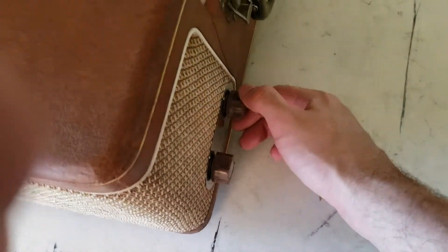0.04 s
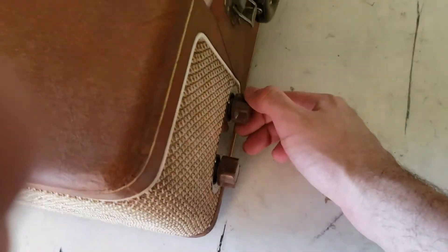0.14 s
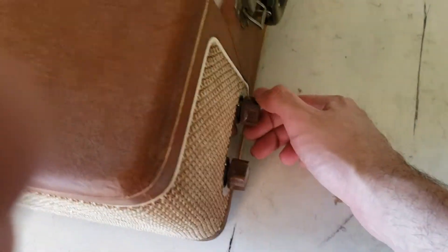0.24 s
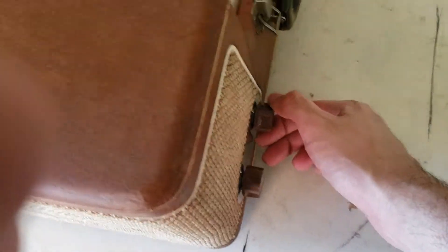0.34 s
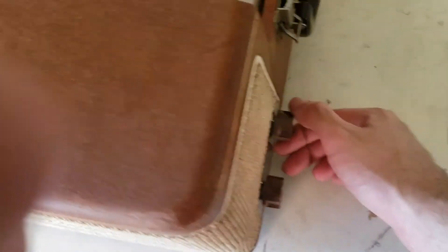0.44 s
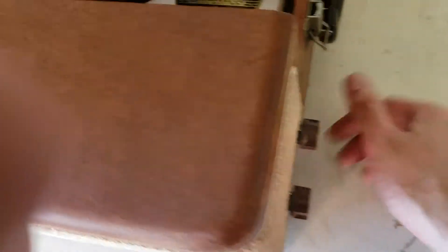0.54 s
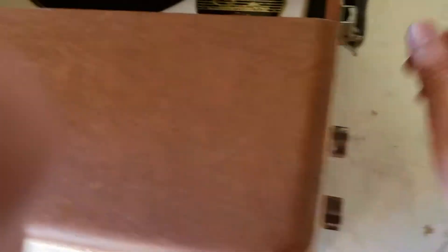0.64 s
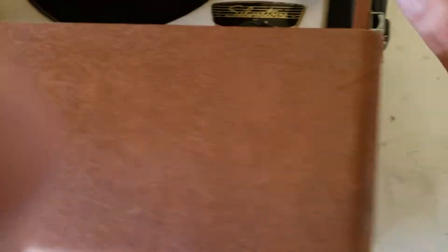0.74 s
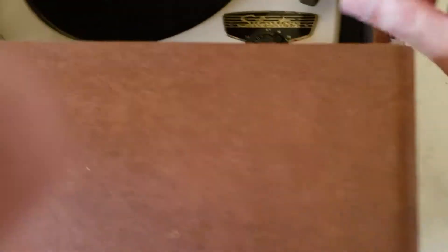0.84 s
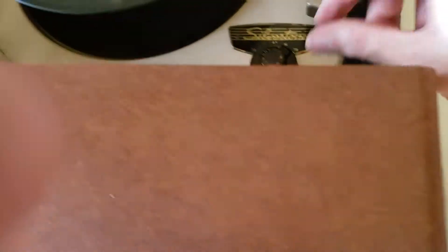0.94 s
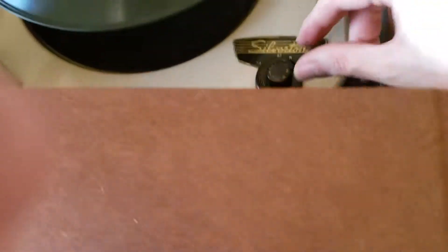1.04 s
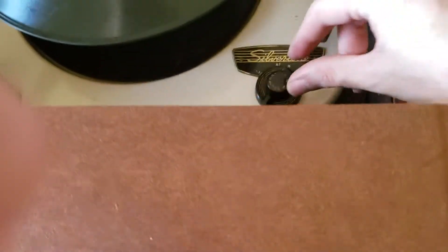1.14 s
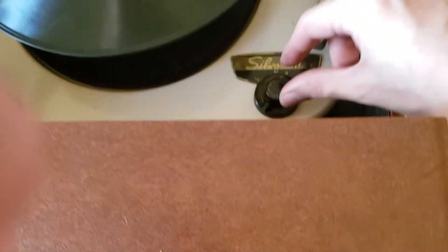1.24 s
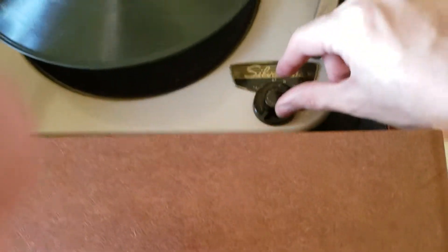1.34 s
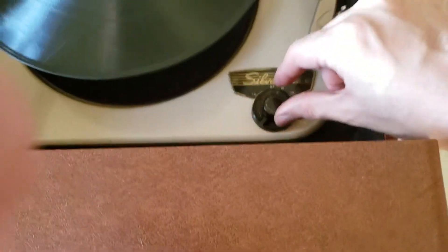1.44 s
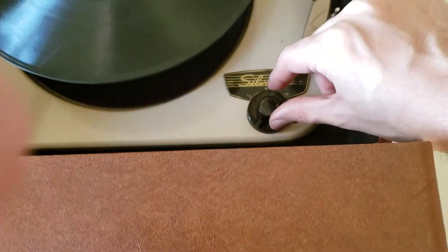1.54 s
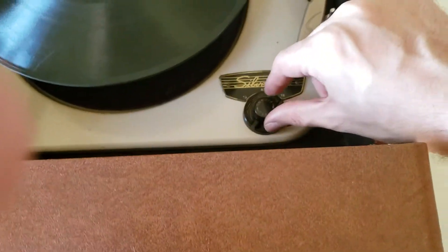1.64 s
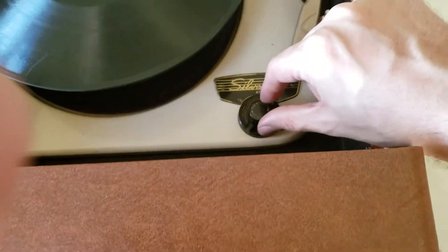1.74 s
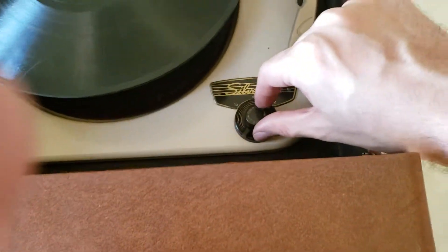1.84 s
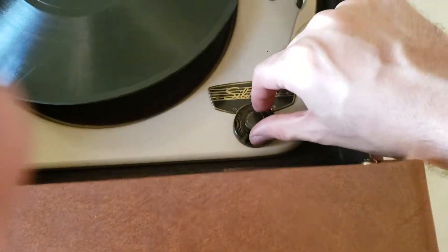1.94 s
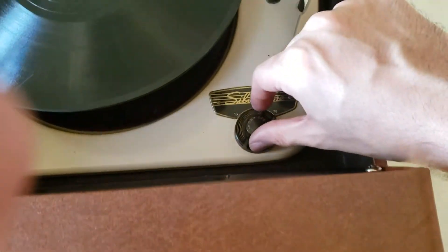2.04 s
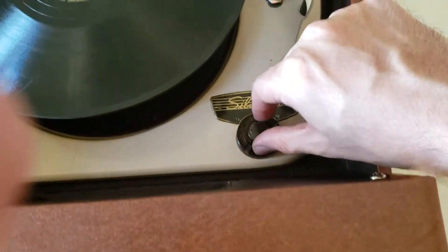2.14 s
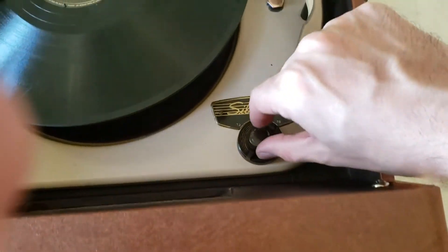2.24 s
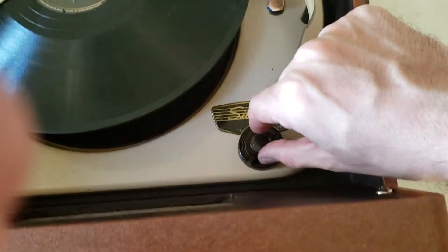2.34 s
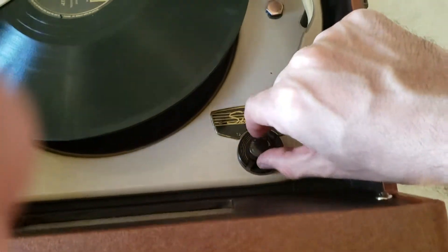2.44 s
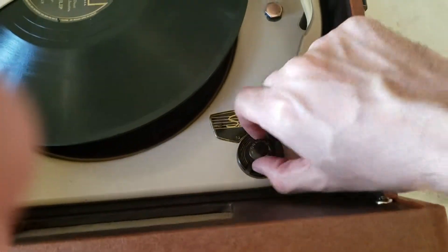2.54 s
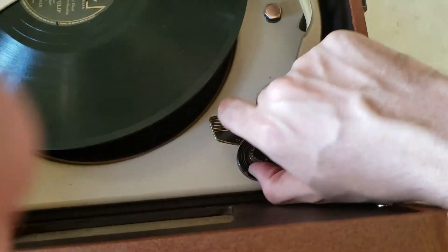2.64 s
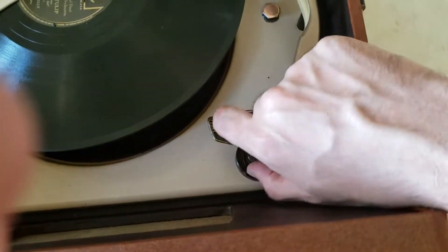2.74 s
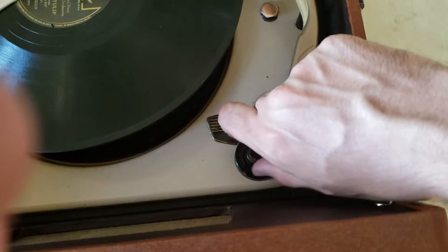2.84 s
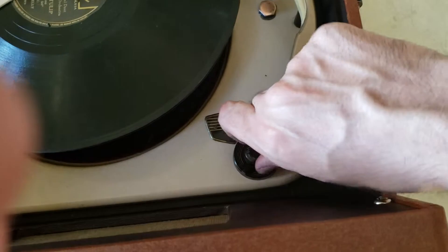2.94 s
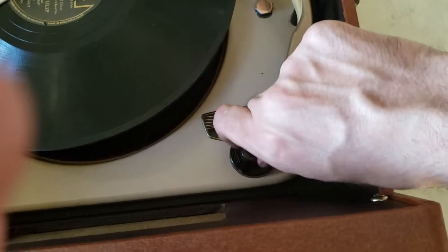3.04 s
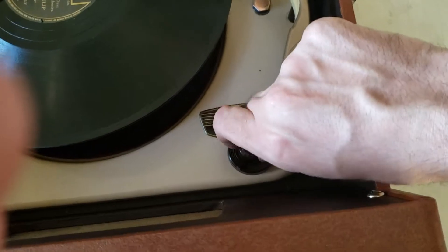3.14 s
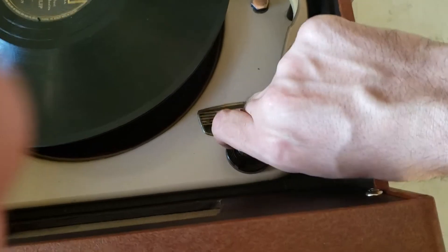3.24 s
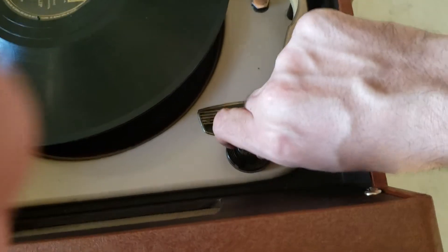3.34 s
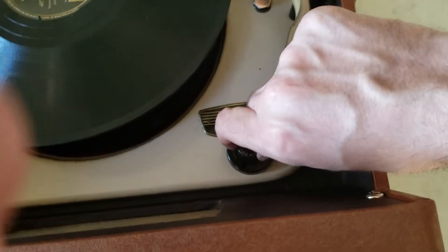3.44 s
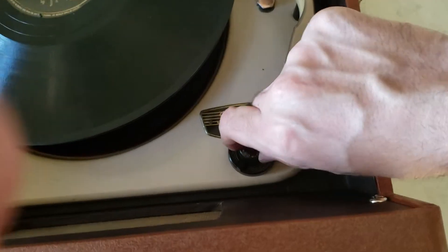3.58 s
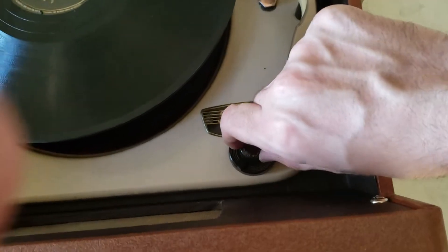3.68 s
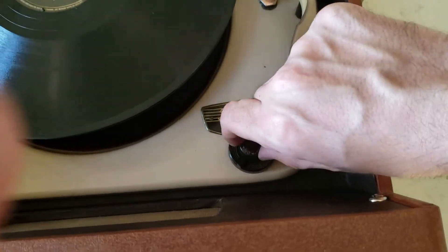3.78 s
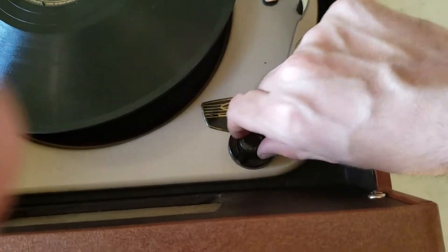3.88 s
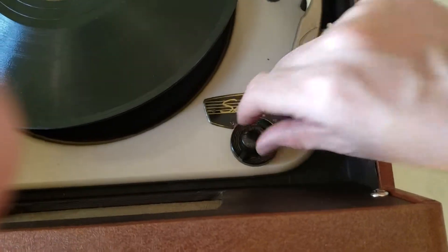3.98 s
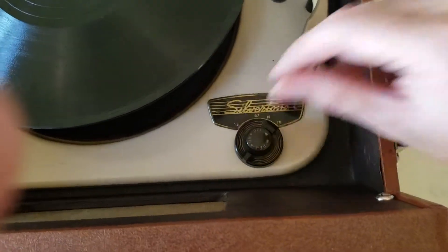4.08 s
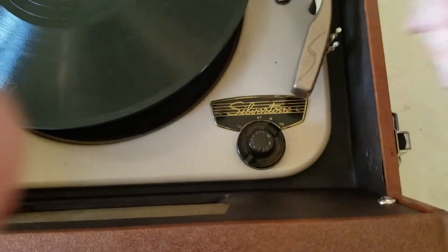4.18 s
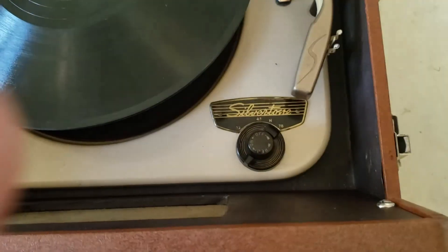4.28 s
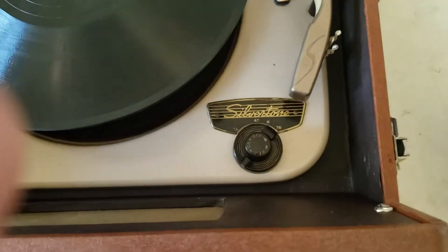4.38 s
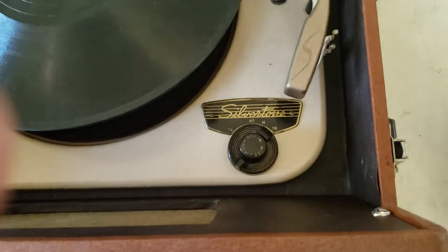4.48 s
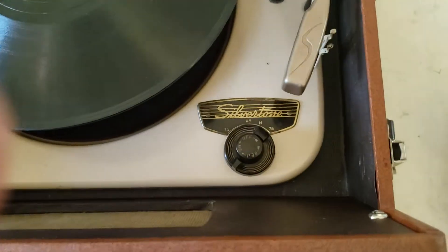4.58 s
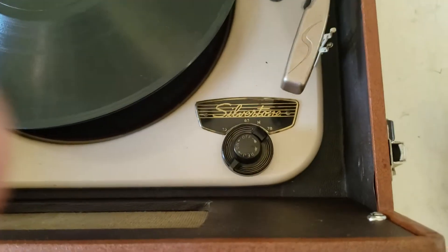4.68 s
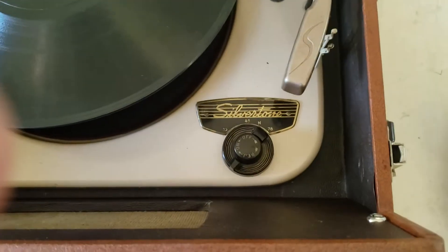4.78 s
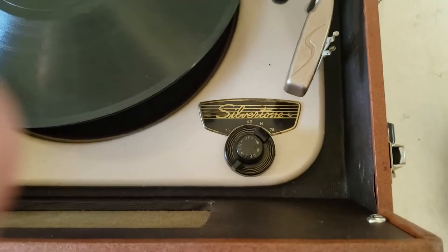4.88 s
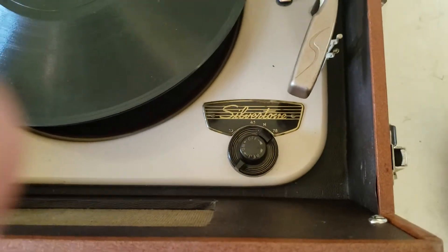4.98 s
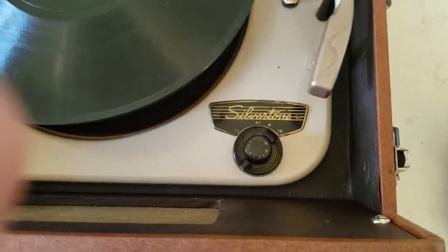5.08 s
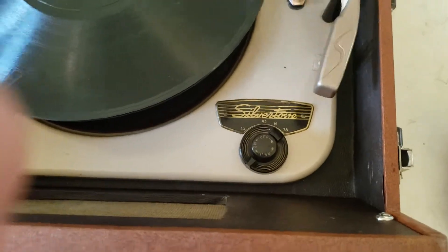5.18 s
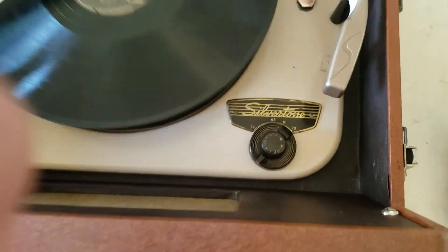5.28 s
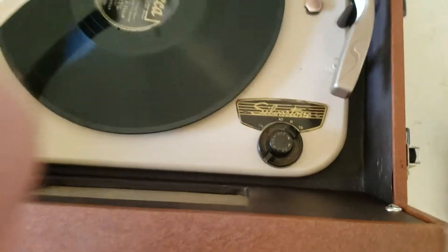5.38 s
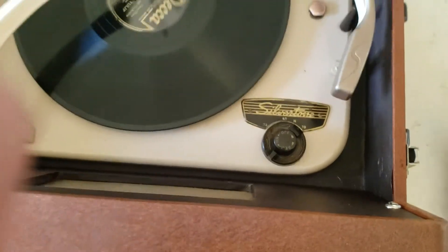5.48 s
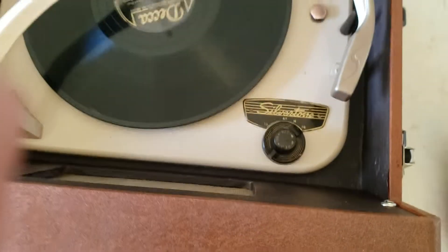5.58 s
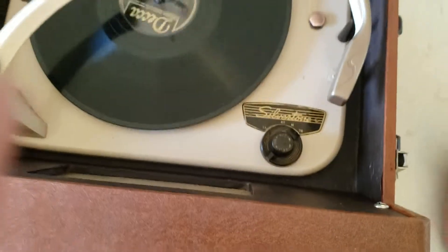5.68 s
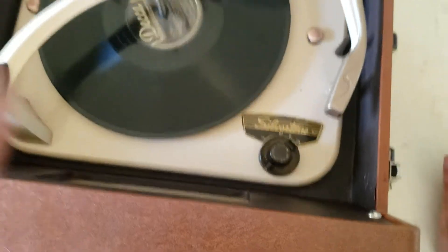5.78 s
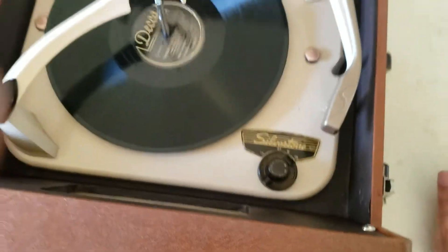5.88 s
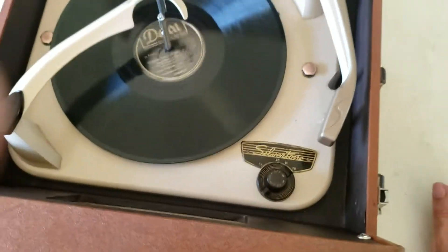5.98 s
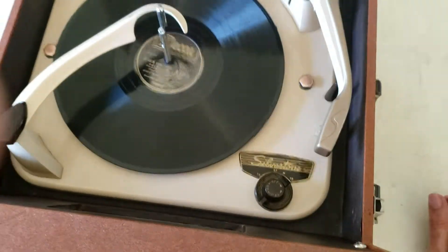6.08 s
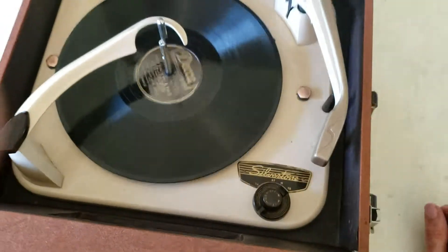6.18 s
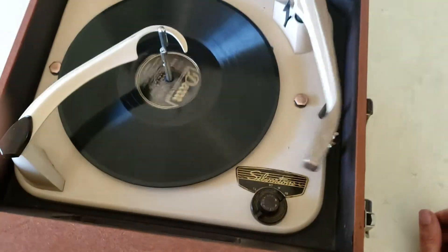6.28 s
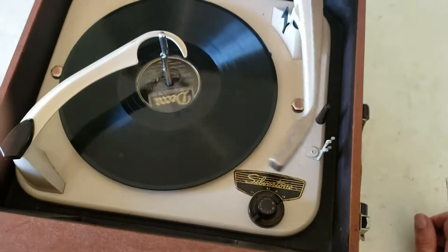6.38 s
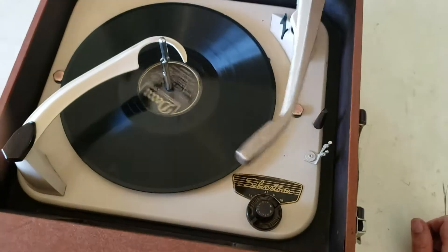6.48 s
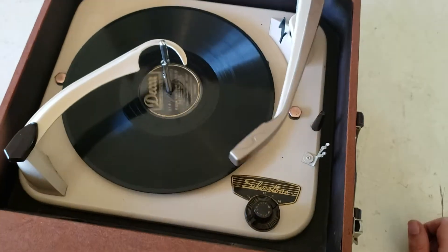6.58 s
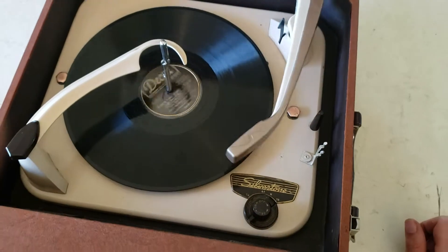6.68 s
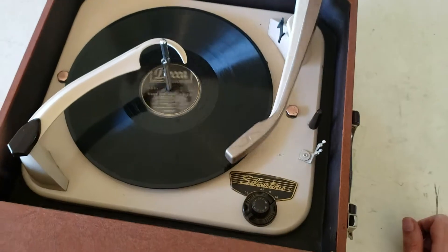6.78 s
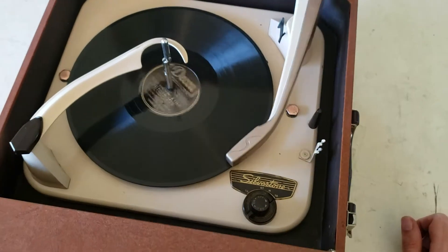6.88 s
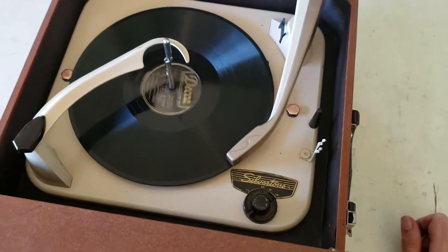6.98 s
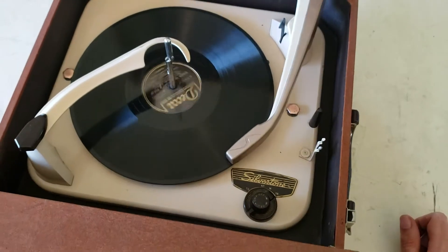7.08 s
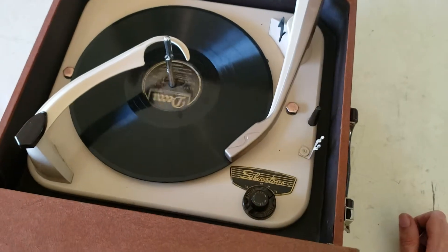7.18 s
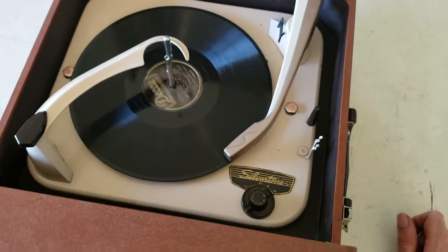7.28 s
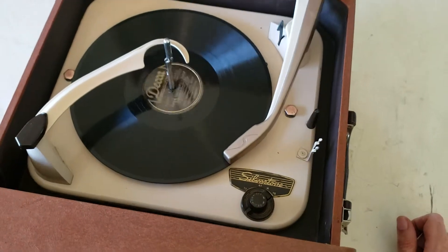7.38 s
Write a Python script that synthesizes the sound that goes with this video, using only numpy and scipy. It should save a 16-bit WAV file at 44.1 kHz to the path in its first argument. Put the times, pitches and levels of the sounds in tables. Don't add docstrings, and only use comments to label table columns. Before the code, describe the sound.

Close mechanical clicks and clunks of an old record changer over faint motor hum, with a heavy disc-drop clack, ticking pawl and soft needle hiss.

```python
import sys
import numpy as np
from scipy import signal
from scipy.fft import rfft, irfft, next_fast_len
from scipy.io import wavfile

SR = 44100
rng = np.random.default_rng(int(sys.argv[2]) if len(sys.argv) > 2 else 0)


def elevation(decibels):
    levels = np.asarray(decibels, float)
    return 10 ** (levels / 20)


def materialize(psi):
    bounded = np.clip(np.atleast_2d(psi).T, -1, 1)
    quanta = np.round(bounded * 32767).astype(np.int16)
    wavfile.write(sys.argv[1], SR, quanta)


N = 327307

# t/s, cam load/dB, sliding speed/dB
GEAR = [(0, 1, 6), (.9, -.8, -1), (2.0, 0.2, -1), (3.0, 1, 1), (3.14, 4, 9), (3.6, -.4, 1), (3.85, 3.5, 12),
        (4.0, 8, 24), (4.4, 5, 14.5), (4.876, 9.5, 23), (5.12, 10, 6), (5.27, 5, 22.5), (5.55, 6, 9),
        (5.8, 1.5, 2.5), (5.96, 0, 10), (6.26, -1.3, 5), (6.94, 0.2, 14), (7.42, -3, 9)]
IDLE_DB = [-58, -80, -82.5, -86.5]
# f/Hz, density/dB per Hz
RUMBLE = [(25, -25), (40, -16.5), (50, -0.5), (100, -11), (150, -15.5), (240, -3.5), (400, -5.5),
          (550, -11), (700, -8.5), (850, -18.5), (1000, -25.5), (1300, -34.5)]
# f/Hz, density/dB per Hz
RUB = [(1000, -0.5), (1900, -16.5), (2900, -11.5), (3600, -13.5), (4500, 5.5), (5700, -24), (7200, -5.5),
       (8300, -22), (10000, -17), (13000, -12), (16000, -12)]
# f/Hz, width/Hz, level/dB
SQUEAK = [(1427, 40, -4.5), (4200, 50, -6), (4410, 30, 1.5), (6400, 30, -5)]
# f/Hz, width/Hz, level/dB
GROOVE = [(4850, 50, 1.5), (12000, 70, 1.5), (14800, 100, 0.5)]
# t/s, hold/s, time to lose 30 dB/s, case level/dB, steel level/dB
SHUDDERS = [
    (2.283, .02, 0.1, -51, -63),
    (2.416, .165, 0.5, -45.5, -82),
    (2.597, .005, 0.3853, -32.5, -66),
    (5.3, .005, 0.88, -39.5, -62),
    (5.3, .005, 0.17, -45, -26),
]
NEEDLE_DB = [-61, -59, -63]
# f/Hz, width/Hz, level/dB
HUM = [(48, 8.9, -10), (97.3, 8, -3), (123.3, 2.6, -8.5), (179.8, 7.1, -9), (243.1, 8, -1),
       (386.5, 18.6, -5), (448.4, 8.8, -8), (582, 10, -16.5), (1360, 9.4, -24)]
# t/s, f/Hz, level/dB
WHIRR = [(0, 388, -76), (1.0, 388, -66), (2.3, 389, -63), (3.3, 388, -60), (5.2, 388, -60), (5.6, 387, -63),
         (6.8, 389, -63), (7.42, 389, -67)]
# t/s, hold/s, time to lose 30 dB/s, level/dB
STEPS = [(.45, 0.24, .9, -56.5), (1.38, .14, .25, -56), (2.8, .5, 0.5, -64), (5.2, .2, 1.5, -68)]
# f/Hz, density/dB per Hz
HISS = [(530, -31.5), (900, -15), (1360, -24.5), (1670, -11.5), (5790, -24.5), (7300, -4), (9200, -28),
        (15200, -14.5), (15900, -27), (16500, -42)]
# f/Hz, correlation/1
LIKENESS = [(30, 0.94), (300, 0.79), (700, 0.2), (1500, 0), (3000, 0), (16000, 0.0078)]
# t of top speed/s, half length/s, top whine f/Hz, whine level/dB, dry bearing level/dB
KNOB = [
    (.132, 0.099, 11800, -64.5, -66),
    (2.495, .12, 11400, -88, -110),
]
# f/Hz, width/Hz, level/dB
BEARING = [(1710, 250, -11), (2300, 500, -6.5), (4520, 220, -2), (6000, 390, -6), (11500, 1400, -9)]
# t/s, f/Hz, level/dB, t60/s
RINGS = [(.22, 4500, -72, .35), (2.225, 90, -50.5, 0.23), (2.415, 543, -45, 0.074), (2.593, 975, -36, 0.55),
         (2.594, 540, -31, 0.15), (2.61, 131.4, -35, 0.3), (2.903, 5100, -43, 0.055), (2.908, 300, -35, .1),
         (3.09, 310, -29, .09), (3.134, 330, -37, .1), (3.09, 6380, -28, 0.056), (3.09, 12600, -35, 0.19),
         (3.858, 810, -33, 0.077), (4.462, 5170, -33, 0.024), (4.644, 5220, -33, 0.12), (4.8, 270, -40, .1),
         (5.091, 13700, -27, 0.2), (5.115, 300, -37, .1), (5.29, 2300, -37, 0.07), (5.31, 56.3, -45, 0.64),
         (5.314, 7600, -24, 0.15), (5.315, 6300, -25, .08), (5.314, 1150, -26, 0.11),
         (5.313, 268, -20.5, 0.086), (5.314, 1620, -32, .09), (5.36, 272, -31, .09),
         (5.377, 769, -14, 0.028), (5.378, 1330, -24, .03), (5.385, 385, -19, .1), (5.4, 1830, -42, .3),
         (5.379, 990, -19, 0.07), (5.372, 180, -21, .08), (5.379, 640, -27, .1), (5.3, 740, -30, .1),
         (5.312, 930, -26, .06), (5.66, 850, -48, .08), (5.922, 860, -54, .15),
         (6.14, 1084, -52, 0.078), (6.227, 1600, -42, .05), (6.228, 4080, -40, 0.12),
             (6.228, 2300, -45, .05), (6.58, 1000, -40, .06), (6.365, 6000, -56, 0.11),
             (6.491, 1310, -34, 0.07), (6.491, 2300, -38, .05), (6.491, 350, -39, .08),
             (6.552, 12200, -39, .14), (6.552, 1350, -42, .07), (6.826, 3960, -33, 0.043),
             (6.826, 1420, -41, 0.06), (6.826, 380, -44, .1), (6.826, 2900, -38, .08),
             (6.826, 2150, -41, .08), (6.948, 150, -53, .25), (6.951, 274, -46, 0.1),
             (6.953, 14600, -48, .04), (7.15, 294, -45, 0.055), (7.197, 7300, -52, .05)]
# t/s, hold/s, time to lose 30 dB/s, dull level/dB, bright level/dB
FINGER = [(.4, 0.4, 1.5, -100, -82), (1.073, .02, .4, -79, -82), (1.56, .09, .2, -68, -86),
          (2.08, .27, .6, -59, -67), (2.577, .01, 0, -55, -67.5)]
# f/Hz, density/dB per Hz
SCUFF = [(1100, 2.5), (1800, 5.5), (2400, .5), (3000, -17), (5000, -7.5), (6300, -10.5), (7300, 8.5),
         (8000, -6)]
# t/s, lever snap/dB, case thump/dB, chatter t60/s
SNAPS = [(1.543, -68, -46, .07), (2.27, -49, -43.5, 0.081), (2.9109, -43, -38.5, 0.046),
         (3.0895, -18, -33, 0.041), (3.898, -38.5, -48, .1), (3.9797, -21.5, -40, .049),
         (4.0215, -30, -51, 0.03), (4.6441, -28, -46.5, 0.024), (4.6595, -27.5, -42, 0.051),
         (4.8795, -49, -37, .04), (5.0808, -29.5, -45, 0.069), (5.0837, -24, -47, .12),
         (5.0913, -18.5, -32.5, .045), (5.2346, -37, -49.5, 0.016), (5.2899, -22.5, -48, 0.042),
         (5.2988, -16.5, -34, .02), (5.3142, -12.5, -25, .045), (5.3782, -30, -14, 0.04),
         (6.552, -34, -44, .08), (5.3851, -24, -34, .04), (5.344, -24, -32, .04)]
# t/s, snap/dB, thump/dB, chatter t60/s
CLICKS = [(2.067, -64, -65, 0.054), (2.2197, -48, -54.5, .044), (2.2362, -48.5, -44.5, 0.067),
          (2.6704, -58, -38, 0.057), (2.9023, -46, -40, 0.03), (3.8591, -31, -38, 0.038),
          (4.8452, -44, -39, .083), (5.0191, -56, -49.5, .056), (5.058, -52, -47, .048),
          (6.7075, -47.5, -70, 0.032)]
# t/s, snap/dB, thump/dB, chatter t60/s
KNOCKS = [(2.4136, -64, -35, 0.097), (2.4493, -70.5, -44, 0.078), (2.4877, -67, -37, .04),
          (2.592, -50.5, -24, 0.13), (2.602, -48, -27, .1), (2.6243, -43, -28, 0.13), (2.645, -56, -33, .1),
          (2.741, -66, -40, .05), (2.806, -60, -51, 0.056), (3.134, -34, -42, .04),
          (4.4621, -34, -51, .015), (4.799, -47.5, -41.5, 0.031), (4.9327, -50, -47.5, 0.027),
          (4.9553, -51, -60, .034)]
# t/s, snap/dB
TICKS = [(5.443, -32), (5.5202, -33), (5.6134, -34), (5.6846, -37), (5.7617, -38.5), (5.8407, -45.5),
         (5.914, -53.5)]
# t/s, thump/dB
NUDGES = [(5.667, -46), (5.788, -56), (5.82, -57), (5.865, -56), (5.926, -53), (5.977, -55), (6.011, -57),
          (7.042, -54), (7.075, -56), (7.12, -56), (7.14, -55)]
# t/s, snap/dB, thump/dB, chatter t60/s, small parts re snap/dB
ARM = [(6.1409, -55, -45, .028, -11), (6.2275, -39.5, -48, .017, -28), (6.364, -48, -56, .06, -20),
       (6.4907, -28, -42, .028, -10), (6.58, -38, -41, .05, -11), (6.778, -47, -66, .051, -32),
       (6.8253, -30, -52, .055, -36), (6.9525, -51, -60, .03, .1), (6.988, -51, -61, .02, .1),
       (7.1967, -53, -60, .03, -9), (7.2582, -55, -57, .022, -22)]
SMALL_PARTS_DB = [-5, -13, -25, -12]
DECK_DB = [.1, 1.5, 2.5, -4]
# f/Hz, level/dB, t60/s
CASE = [(176.7, -14, 0.21), (279.6, -2, 0.12), (317, -6.5, 0.098), (391.5, -1, 0.11), (483.5, -5, 0.076)]
# f/Hz, level/dB, t60/s
DECK = [(699, -0.5, 0.093), (810, -10, 0.15), (965, 4.5, 0.089), (1150, 1.5, 0.035), (1407, 0.5, 0.05),
        (1640, -1.5, .07), (2300, -2.5, 0.21)]
# f/Hz, level/dB, t60/s
STEEL = [(4050, -1.5, 0.064), (4330, 8.6, 0.12), (6690, 6.1, 0.033), (7600, 2.3, 0.18)]
# f/Hz, level/dB, t60/s
SMALL = [(10300, -1.5, 0.11), (12670, -4, 0.046), (13700, 0, 0.076)]
ROOM_T60_S = [0.6, 0.32, .4, 0.3]
# f/Hz, width/Hz, level/dB
CARRIER = [(1330, 120, 0), (1790, 73, -2), (2410, 120, -4), (2830, 180, -3), (3270, 130, -8),
           (4790, 53, -5), (7310, 130, -10), (11000, 310, -13), (11900, 140, -10), (12900, 68, -13),
           (13800, 96, -12), (14900, 160, -10)]

SHUDDER_DECK_DB, SHUDDER_FINE_DB = -15.5, -14
FINE_FOLLOWS, BOOM_FOLLOWS, HUM_FOLLOWS = .25, .5, .24
MOTOR_ON_S, HUM_OFF_DB, HUM_ON_DB = 2.3, -66, -62
STEP_ATTACK_S, STILL_DB, BOOM_DB, HISS_DB = .6, -73, -60, -84
AWAY_S, AWAY_END_S, AWAY_BOOM_DB, AWAY_HUM_DB = 5.3, 7.3, -21, -6
SLOW_HZ, WHINE_SLOPE_DB, BEARING_LINGER_S = 3300, 33, .19
BRIGHT_DIES_FASTER = 1.8
PAWL_HZ, PAWL_DB, PAWL_T60_S = 4400, -6, .06
TICK_THUMP_DB, TICK_CHATTER_S, TICK_DULLING = -18, .009, .9
NUDGE_SNAP_DB, NUDGE_DECK_DB, NUDGE_CHATTER_S = -22, 1.2, .04
ARM_DECK_DB, DECK_SHARE = 5.0, .52
NEEDLE_S, NEEDLE_HOLD_S, NEEDLE_FADE_S, CARRIER_DB = 6.955, .2, 1.3, -69
LEFT_LAG = 5


def rms_one(x):
    return x / np.sqrt(np.mean(x ** 2) + 1e-20)


def in_time(rows):
    s, *columns = np.transpose(rows)
    return [np.interp(np.arange(N) / SR, s, c) for c in columns]


def at_hz(points, hz):
    points = np.array(points)
    return np.interp(np.log(hz), np.log(points[:, 0]), points[:, 1])


def band(x, low_hz, high_hz):
    return signal.sosfilt(signal.butter(2, [low_hz, high_hz], "band", fs=SR, output="sos"), x)


def drift(rate, spread_db):
    r = np.exp(-80 * np.pi * rate / SR)
    slow = signal.lfilter([1], [1, -2 * r, r * r], rng.standard_normal(N // 40 + 2002))[2000:]
    return np.interp(np.arange(N) / 40, np.arange(len(slow)), elevation(spread_db * rms_one(slow)))


def ring(x, hz, width_hz):
    r, w = np.exp(-np.pi * width_hz / SR), 2 * np.pi * hz / SR
    return signal.lfilter([0, np.sin(w)], [1, -2 * r * np.cos(w), r * r], x + 1e-18)


def swell(s, attack_s, hold_s, release_s):
    t = np.arange(N // 44 + 2) / 1000
    rise = np.minimum(30 * (t - s) / attack_s, 0)
    return np.minimum(rise, -30 * (t - s - hold_s) / release_s)


def loudest(*levels_db):
    top = np.max(np.broadcast_arrays(*levels_db), axis=0)
    return np.interp(np.arange(N) / SR, np.arange(len(top)) / 1000, top)


def banded_noise(spectrum, low_hz, high_hz, patchy_db, grain_db, count):
    edges = np.geomspace(low_hz, high_hz, count + 1)
    white = rng.standard_normal((2, 2, N)) * drift(55, grain_db)
    out = 0
    for k, (low, high) in enumerate(zip(edges, edges[1:])):
        center_hz = np.sqrt(low * high)
        mid, side = band(white[k % 2], low, high)
        alike = np.clip(at_hz(LIKENESS, center_hz), -1, 1)
        gain = elevation(at_hz(spectrum, center_hz)) * drift(7.9, patchy_db)
        mid = gain * np.sqrt(1 + alike) * mid
        side = gain * np.sqrt(1 - alike) * side
        out = out + np.array([mid + side, mid - side])
    return rms_one(out)


def sing(peaks):
    grit = rng.standard_normal((2, N)) * drift(12, 3.0)
    out = 0
    for hz, width, db in peaks:
        even = np.sqrt(width) * hz / 1e4 / np.sin(2 * np.pi * hz / SR)
        out = out + elevation(db) * even * ring(grit, hz, width)
    return rms_one(out)


def gear_levels():
    load, slide = in_time(GEAR)
    shakes = [(swell(s, .011, hold, release), case, steel) for s, hold, release, case, steel in SHUDDERS]
    needle_swell = swell(NEEDLE_S, .011, NEEDLE_HOLD_S, NEEDLE_FADE_S)
    case = loudest(*[e + db for e, db, _ in shakes])
    steel = loudest(*[e + db for e, _, db in shakes])
    sudden = [case, case + SHUDDER_DECK_DB, steel, steel + SHUDDER_FINE_DB]
    sudden[1:] = [np.maximum(level, loudest(needle_swell + db)) for level, db in zip(sudden[1:], NEEDLE_DB)]
    follow = [load, slide, slide, FINE_FOLLOWS * slide]
    return [np.maximum(idle + over, level) for idle, over, level in zip(IDLE_DB, follow, sudden)]


def running_gear():
    case_db, deck_db, steel_db, fine_db = gear_levels()
    case = banded_noise(RUMBLE, 196.7, 1164, patchy_db=2.5, grain_db=.5, count=6)
    deck = banded_noise(RUB, 1100, 3020, patchy_db=-.5, grain_db=3.5, count=3)
    steel = banded_noise(RUB, 3320, 7760, patchy_db=2.5, grain_db=1.5, count=3)
    steel += elevation(-7.5) * band(sing(SQUEAK), 1200, 7000)
    fine = banded_noise(RUB, 10000, 15800, patchy_db=0.0, grain_db=2.5, count=3)
    fine += elevation(-6.5) * band(sing(GROOVE), 4000, 15500)
    rubs = elevation(deck_db - 2) * deck + elevation(steel_db - 3) * steel + elevation(fine_db - 2) * fine
    return elevation(case_db) * case + rubs


def away():
    return np.clip((np.arange(N) / SR - AWAY_S) / (AWAY_END_S - AWAY_S), 0, 1)


def motor():
    load = in_time(GEAR)[0]
    level_db = np.where(np.arange(N) / SR < MOTOR_ON_S, HUM_OFF_DB, HUM_ON_DB)
    level_db = level_db + HUM_FOLLOWS * load + AWAY_HUM_DB * away()
    shake = rng.standard_normal(N)
    hum = sum(elevation(db) * rms_one(ring(ring(shake, hz, width), hz, 2.5 * width)) for hz, width, db in HUM)
    hz, tone_db = in_time(WHIRR)
    tone = np.sin(2 * np.pi * np.cumsum(hz * drift(14, .08)) / SR)
    return elevation(tone_db + 1.5) * drift(12, 3.0) * tone + elevation(level_db) * hum


def floor():
    sway_db = loudest(STILL_DB, *[db + swell(s, STEP_ATTACK_S, hold, release) for s, hold, release, db in STEPS])
    boom_db = BOOM_DB + BOOM_FOLLOWS * in_time(GEAR)[0] + AWAY_BOOM_DB * np.sqrt(away())
    low = banded_noise(RUMBLE, 36, 70.2, patchy_db=4.0, grain_db=-2.0, count=3)
    boom = banded_noise(RUMBLE, 88, 189, patchy_db=4.5, grain_db=-4.5, count=2)
    return elevation(sway_db) * low + elevation(boom_db) * boom


def air_hiss():
    return elevation(HISS_DB + 2.5) * banded_noise(HISS, 830, 15900, patchy_db=.7, grain_db=1.0, count=8)


def twist(mid_s, half_s, top_hz, whine_db, bearing_db):
    u = np.linspace(-1, 2, 31)
    slow = np.minimum(u ** 2, 1)
    linger = np.maximum(u * half_s / BEARING_LINGER_S, 0)
    bearing = bearing_db - 26 * np.maximum(-u, 0) ** 2 - 30 * linger ** 3
    whine = whine_db - WHINE_SLOPE_DB * slow ** 2 - 40 * (u > 1)
    return np.transpose([mid_s + half_s * u, top_hz - SLOW_HZ * slow, whine, bearing])


def knob(turn):
    hz, whine_db, bearing_db = in_time(turn)
    on = slice(round(turn[0][0] * SR), round(turn[-1][0] * SR))
    partner_hz = 7400 + .31 * hz
    whine = np.sin(2 * np.pi * np.cumsum(hz * drift(86, .041)) / SR) * drift(40, 3.0)
    partner = np.sin(2 * np.pi * np.cumsum(partner_hz * drift(72, .06)) / SR) * drift(40, 2.8)
    whine += .96 * partner * (bearing_db > -80)
    grit = (rng.standard_normal(N) * drift(54, 1.1))[on]
    dry_rub = sum(elevation(db) * rms_one(ring(ring(grit, f, width), f, 6.1 * width)) for f, width, db in BEARING)
    out = np.zeros(N)
    out[on] = (elevation(whine_db) * whine)[on] + elevation(bearing_db[on]) * rms_one(dry_rub)
    return out


def ringing_parts():
    out, t = np.zeros((2, N + SR)), np.arange(SR // 2) / SR
    flutter = np.tile(drift(98, 4.8), 2)
    parts = RINGS + [(s, PAWL_HZ, db + PAWL_DB, PAWL_T60_S) for s, db in TICKS[1:]]
    for (s, hz, db, t60), (split, lean_db) in zip(parts, rng.normal(0, 1, (len(parts), 2))):
        partner_hz = hz * (1.02 + .0028 * split)
        pair = np.sin(2 * np.pi * hz * t) + 1.22 * np.sin(2 * np.pi * partner_hz * t)
        rattle = flutter[round(s * SR):][:len(t)] ** np.minimum(t / .03, 1)
        rise = 1 - np.exp(-t / (.0008 + .51 / hz))
        tone = elevation(db - 60 * t / t60) * pair * rattle * rise
        for side, (lag, lean) in enumerate([(LEFT_LAG, 1), (0, -1)]):
            at = round(s * SR) + lag
            out[side, at:at + len(t)] += tone * elevation(lean * lean_db * np.log10(hz / 50))
    return out[:, :N]


def fingers():
    strokes = [(swell(s, .025, hold, release), dull, bright) for s, hold, release, dull, bright in FINGER]
    dull_db = loudest(*[e + db for e, db, _ in strokes])
    bright_db = loudest(*[BRIGHT_DIES_FASTER * e + db for e, _, db in strokes])
    dull = banded_noise(SCUFF, 1000, 2800, patchy_db=-3.5, grain_db=-1.0, count=4)
    bright = banded_noise(SCUFF, 4200, 7510, patchy_db=1.5, grain_db=.5, count=3)
    return elevation(dull_db) * dull + elevation(bright_db) * bright


def contacts():
    rows = []
    for kind, deck, small in zip([SNAPS, CLICKS, KNOCKS], DECK_DB, SMALL_PARTS_DB):
        rows += [(*row, small, deck) for row in kind]
    for s, db in TICKS:
        small = SMALL_PARTS_DB[3] + TICK_DULLING * (db - TICKS[0][1])
        rows.append((s, db, db + TICK_THUMP_DB, TICK_CHATTER_S, small, DECK_DB[3]))
    rows += [(s, db + NUDGE_SNAP_DB, db, NUDGE_CHATTER_S, -25, NUDGE_DECK_DB) for s, db in NUDGES]
    rows += [(*row, ARM_DECK_DB) for row in ARM]
    return sorted((s, snap, thump, deck + DECK_SHARE * thump + (1 - DECK_SHARE) * snap, snap + small, t60)
                  for s, snap, thump, t60, small, deck in rows)


def chatter(t60_s, rise_s):
    t = np.arange(int(.15 * SR)) / SR
    uneven = elevation(2.5 * np.minimum(rng.exponential(1, len(t)), 3))
    blows = rng.standard_normal(len(t)) * uneven * (rng.random(len(t)) < .3)
    swarm = blows * elevation(-60 * t / max(t60_s, .003)) * (1 - np.exp(-t / rise_s))
    swarm = swarm / np.sqrt(np.sum(swarm ** 2))
    swarm[round(rise_s * SR)] += .018 / max(t60_s, .008)
    return swarm / np.sqrt(np.sum(swarm ** 2))


def answer(modes, low_hz, high_hz, modes_db, body_t60, room_t60, room_db, alike):
    t = np.arange(int(.5 * SR)) / SR
    shared, left, right, far_left, far_right = rng.standard_normal((5, 4, len(t)))
    haze = np.sqrt(alike) * shared + np.sqrt(1 - alike) * np.array([left, right])
    near = haze * elevation(-60 * t / body_t60)
    near[..., 0] += elevation(15.0)
    for hz, db, t60 in modes:
        spot_gain = elevation(modes_db + db + rng.normal(0, 3, (4, 1)))
        near += spot_gain * elevation(-60 * t / t60) * np.sin(2 * np.pi * hz * t)
    near[0] = np.roll(near[0], LEFT_LAG, axis=-1)
    far = elevation(room_db - 60 * t / room_t60) * np.array([far_left, far_right]) * (1 - np.exp(-t / .0032))
    whole = band(band(near + far, low_hz, high_hz), .65 * low_hz, 1.28 * high_hz)
    return whole / np.sqrt(np.sum(whole ** 2, axis=(0, 2), keepdims=True) / 2)


def strike(swarms, level_db, body):
    blows = np.zeros((body.shape[1], N + len(swarms[0])))
    for k, (row, swarm, gain) in enumerate(zip(contacts(), swarms, elevation(level_db))):
        at = round((row[0] - .002) * SR)
        blows[k % len(blows), at:at + len(swarm)] += gain * swarm
    size = next_fast_len(N + body.shape[2])
    shaken = np.sum(rfft(blows[:, :N], size) * rfft(body, size), axis=1)
    return irfft(shaken, size)[:, :N]


def mechanism():
    s, steel_db, case_db, deck_db, small_db, t60 = np.transpose(contacts())
    sharp = [chatter(t, rise_s=.001) for t in t60]
    slow = [chatter(1.31 * t, rise_s=.002) for t in t60]
    soften = np.poly([.88, .75])
    padded = [4.6 * signal.lfilter([.03], soften, x) if d - e > 11 else x
              for x, d, e in zip(sharp, deck_db, steel_db)]
    case_body = answer(CASE, 185, 553, -18, .072, ROOM_T60_S[0], -20.5, alike=.94)
    deck_body = answer(DECK, 550, 2300, -20, .054, ROOM_T60_S[1], -6.5, alike=.6)
    steel_body = answer(STEEL, 3100, 7000, -30, .031, ROOM_T60_S[2], -17, alike=.16)
    small_body = answer(SMALL, 6200, 15900, -23.5, .049, ROOM_T60_S[3], -13, alike=.079)
    case = strike(slow, case_db + 26, case_body)
    deck = strike(padded, deck_db + 23.5, deck_body) * elevation([[-.6], [.6]])
    steel = strike(sharp, steel_db + 20, steel_body) * elevation([[-1.5], [1.5]])
    small = strike(sharp, small_db + 25.3, small_body) * elevation([[1.7], [-1.7]])
    return case + deck + steel + small


def needle():
    grit = rng.standard_normal(N) * (rng.random(N) < .03) * drift(25, 3.5)
    song = 0
    for (hz, width, db), lean_db in zip(CARRIER, rng.normal(0, 3, len(CARRIER))):
        tone = rms_one(ring(ring(grit, hz, width), hz, 3 * width)) * drift(11, 4.0)
        song = song + elevation(db) * tone * elevation([[-lean_db], [lean_db]])
    return elevation(CARRIER_DB + loudest(swell(NEEDLE_S, .011, .22, 1.6))) * song


def scene():
    steady = (running_gear() + motor() + floor()) * elevation([[-.4], [.4]])
    knobs = sum(knob(twist(*row)) for row in KNOB)
    return steady + air_hiss() + knobs + ringing_parts() + fingers() + mechanism() + needle()


def band_limit(x):
    return signal.sosfilt(signal.butter(12, 16960, fs=SR, output="sos"), x)


def record(dry):
    cut = signal.sosfilt(signal.cheby2(10, 60, 16900, fs=SR, output="sos"), dry)
    cut = signal.sosfilt(signal.butter(2, 40, "high", fs=SR, output="sos"), cut)
    cut = signal.sosfilt(signal.cheby2(12, 20, 15950, fs=SR, output="sos"), cut)
    return band_limit(cut)


dry = scene()
out = record(dry)
materialize(out)
```